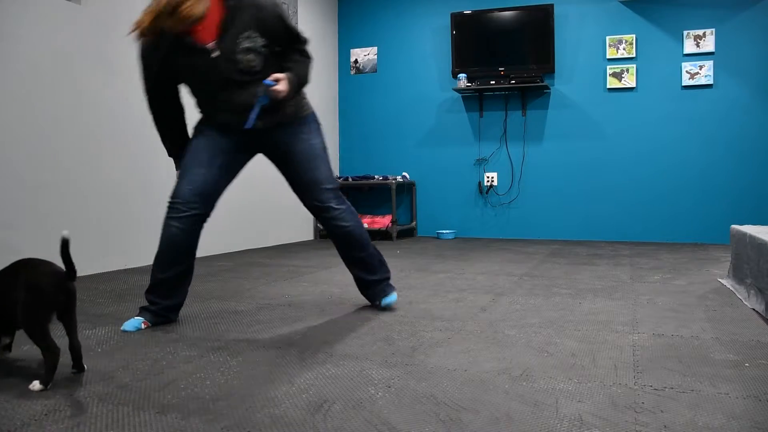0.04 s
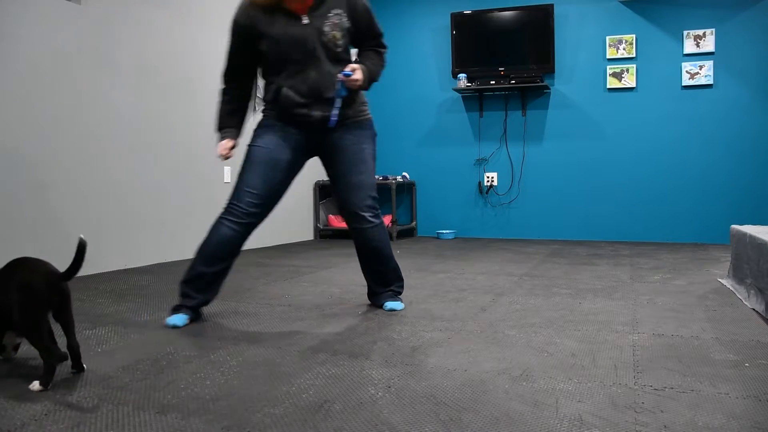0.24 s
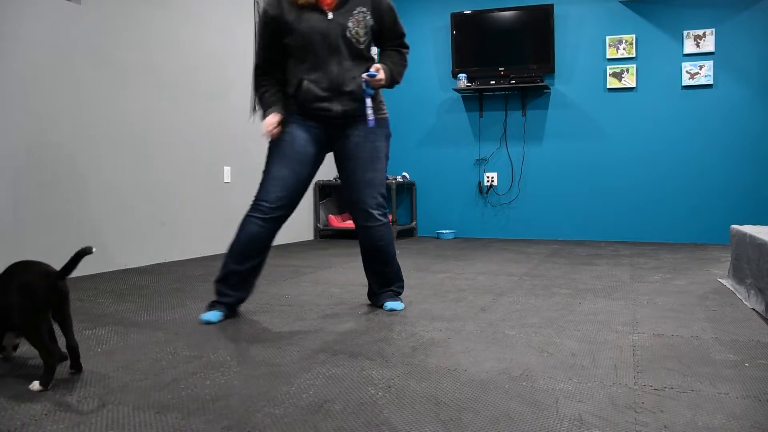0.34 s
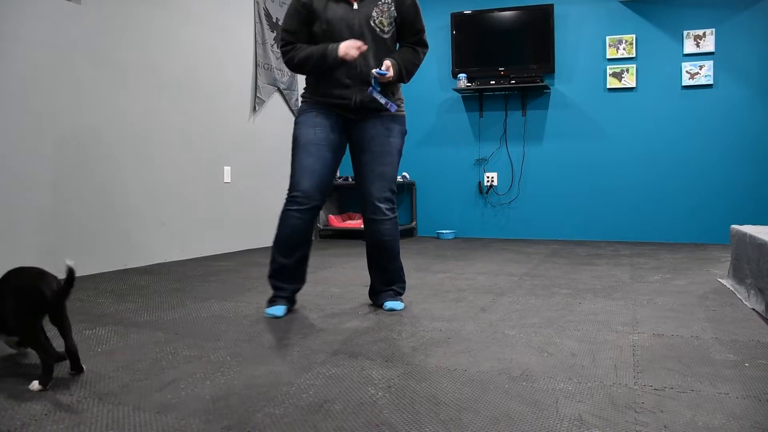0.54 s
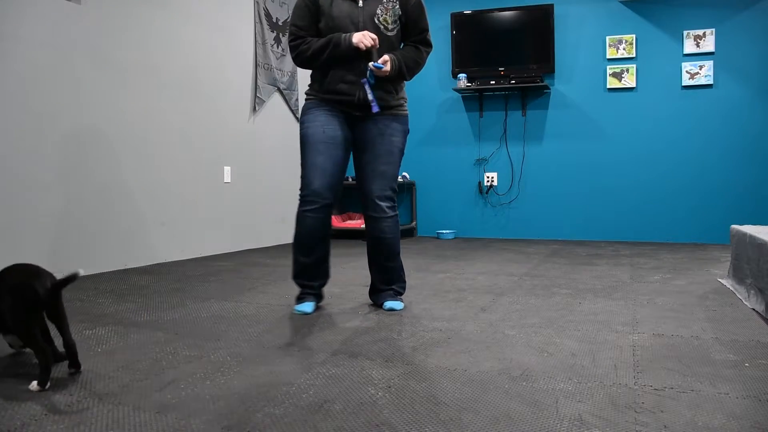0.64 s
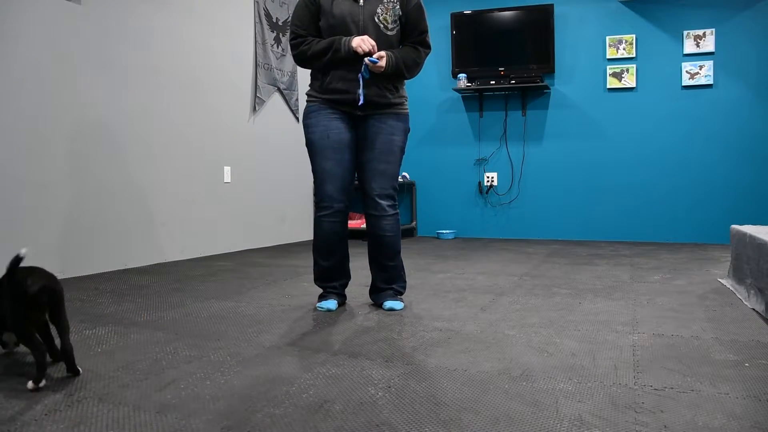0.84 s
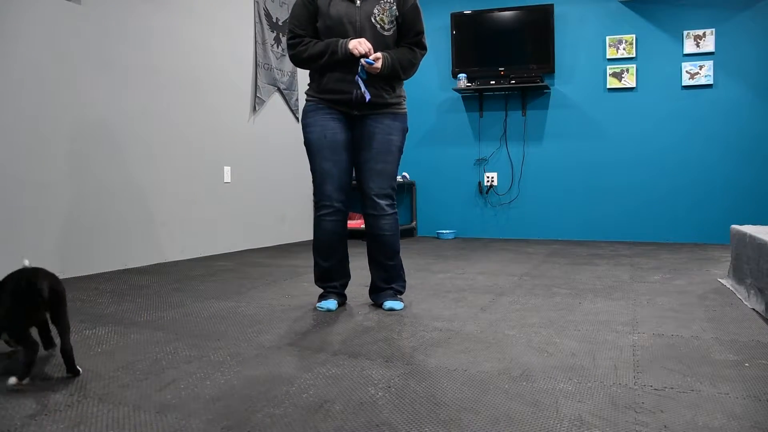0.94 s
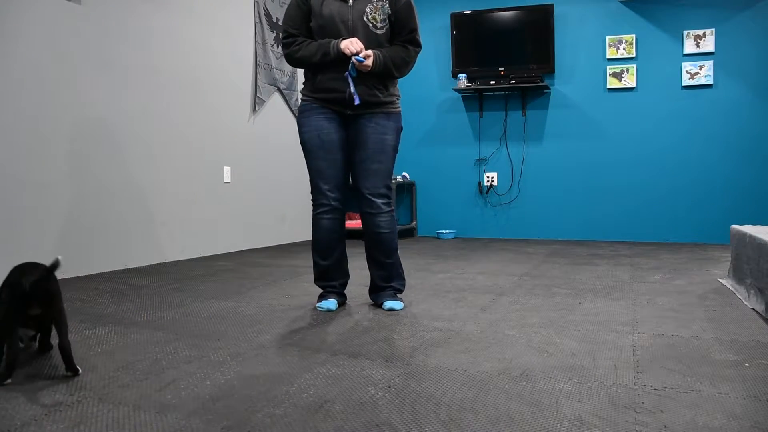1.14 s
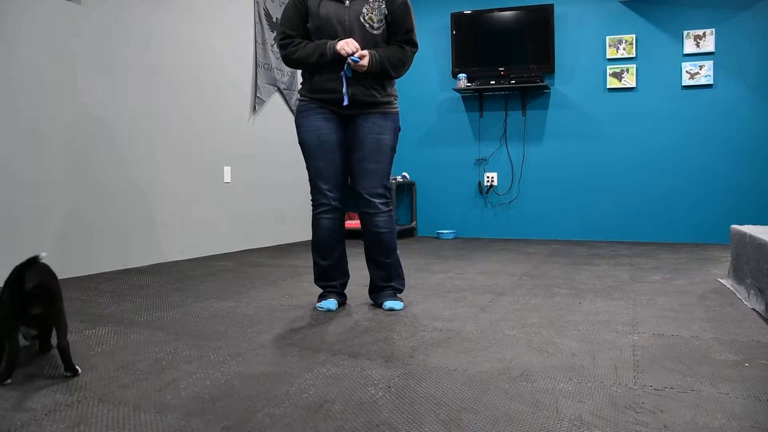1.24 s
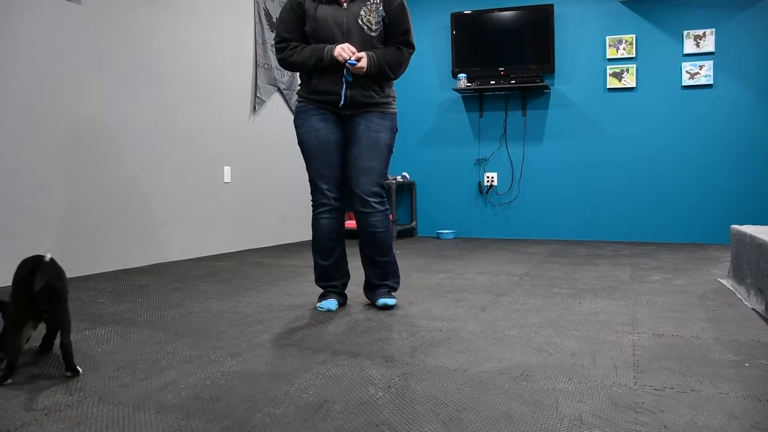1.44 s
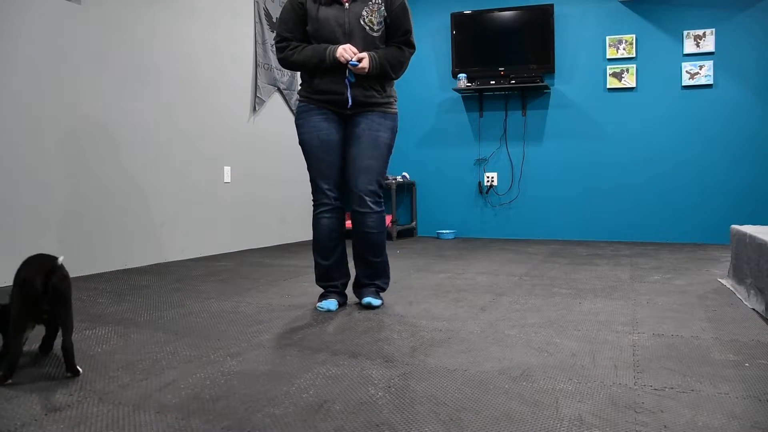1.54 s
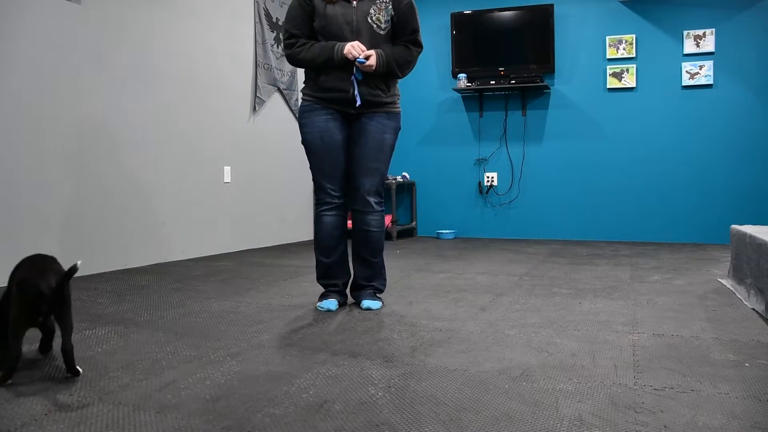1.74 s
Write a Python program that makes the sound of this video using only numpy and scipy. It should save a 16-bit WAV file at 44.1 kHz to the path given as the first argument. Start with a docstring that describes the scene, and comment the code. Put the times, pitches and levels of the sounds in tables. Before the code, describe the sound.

A socked foot drags across a rubber floor with a hiss, amid soft thuds and rustling.

```python
"""Ventilation, a low hum and a thin electrical whine hang in a bare room.
Clothes stir, and a socked foot lands with a soft thud on a textured rubber floor.
The other foot is dragged across to meet it, its fibres hissing over the grain.
Light taps and short scuffs follow, and jeans and a jacket rustle as the weight settles,
the room answering each move."""
import sys
import numpy as np
from scipy import signal
from scipy.fft import rfft, irfft, next_fast_len
from scipy.io import wavfile
from scipy.ndimage import map_coordinates

SR = 44100
rng = np.random.default_rng(int(sys.argv[2]) if len(sys.argv) > 2 else 0)


def inscribe(sig):
    """Save sig as 16-bit PCM at rate SR to the path in sys.argv[1].

    A 1-D sig is mono; a 2-D sig holds one channel per row.
    Samples are clipped to [-1, 1] before scaling.
    """
    pcm = np.round(np.clip(np.atleast_2d(sig).T, -1, 1) * 32767)
    wavfile.write(sys.argv[1], SR, pcm.astype(np.int16))


N = 79380
T = np.arange(N) / SR


def amp(db):
    return 10 ** (np.asarray(db) / 20)


def unit_rms(x):
    return x / np.sqrt(np.mean(x ** 2) + 1e-20)


def curve_at(points, hz):
    """Read a curve of (freq_hz, value) points on a log frequency axis."""
    freqs, values = np.transpose(points)
    return np.interp(np.log(hz + 1), np.log(freqs + 1), values)


def fader(rows):
    """Gain riding through (time_s, level_db) points, silent outside them."""
    return amp(np.interp(T, *np.transpose(rows), left=-120, right=-120))


def wobble(rate_hz):
    """A smooth random drift through rate_hz points a second."""
    return map_coordinates(rng.standard_normal(4096), [T * rate_hz], mode="wrap")


def equalise(x, gain_at):
    """Colour x with a gain that depends on frequency."""
    size = next_fast_len(N + SR // 2)
    return irfft(rfft(x, size) * gain_at(np.fft.rfftfreq(size, 1 / SR)), size)[..., :N]


def friction(spectrum, slips_per_s, smooth):
    """Tiny random slips blended with a share of smooth noise, coloured, at unit rms."""
    slips = rng.standard_normal(N) * (rng.random(N) < slips_per_s / SR)
    force = np.sqrt(1 - smooth) * unit_rms(slips) + np.sqrt(smooth) * rng.standard_normal(N)
    return unit_rms(equalise(force, lambda hz: amp(curve_at(spectrum, hz))))


def envelope(start_s, rise_s, t60_s):
    """A rounded attack, then an exponential decay."""
    age = T - start_s
    attack = np.sin(np.pi / 2 * np.clip(age / rise_s, 0, 1))
    return attack * np.exp(-np.log(1000) * np.maximum(age - rise_s, 0) / t60_s)


# How alike the room sounds left and right: freq_hz, correlation
STEREO_LIKENESS = [(100, 0.7), (300, 0.82), (600, 0.61), (1200, 0.42), (2200, -0.021), (15000, -0.033)]


def diffuse(pair):
    """Spread two unrelated signals all round: near the centre in the lows, wide in the highs."""
    def mid_side_gains(hz):
        angle = np.arccos(curve_at(STEREO_LIKENESS, hz)) / 2
        return np.array([np.cos(angle), np.sin(angle)])
    mid, side = equalise(pair, mid_side_gains)
    return np.array([mid + side, mid - side])


# Ring of the bare room: freq_hz, t60_s
ROOM_DECAY = [(100, 1), (500, 1), (2000, 0.73), (6000, 0.69), (10000, 0.48), (15000, 0.27)]


def room(x, wet_db, early_db, early_s, positions=12):
    """Direct sound, near reflections and a tail, crossfading to fresh echoes as the feet move."""
    hz, t, noise = signal.stft(rng.standard_normal((positions, 2, SR // 3)), SR, nperseg=256)
    late = np.exp(-np.log(1000) * t / curve_at(ROOM_DECAY, hz)[:, None])
    early = amp(early_db) * np.exp(-t / early_s)
    tails = signal.istft(noise * (late + early), SR, nperseg=256)[1]
    tails /= np.sqrt(np.mean(np.sum(tails ** 2, axis=-1)))
    hop = N // positions + 1
    padded, wet = np.pad(x, (0, 2 * hop)), np.zeros((2, N + SR))
    for k, tail in enumerate(tails):
        crossfade = signal.windows.cosine(2 * hop)
        if k == 0:
            crossfade[:hop] = 1
        piece = padded[k * hop:][:2 * hop] * crossfade
        echo = signal.fftconvolve(piece[None], tail, axes=1)
        wet[:, k * hop:][:, :echo.shape[1]] += echo
    return (x + amp(wet_db) * diffuse(wet[:, :N])) / np.hypot(1, amp(wet_db))


# Colour of the ventilation: freq_hz, gain_db
AIR_EQ = [(25, 4), (45, 5), (110, 8), (170, 4.5), (400, 5.5), (800, 2), (2000, -2), (4000, 0.5), (8500, 1),
          (10500, -7), (13000, -7), (15600, -18)]
# The hum sinking away: time_s, level_db
HUM_FADE = [(0, -60.5), (.75, -63), (1.15, -65.5), (1.5, -72), (1.8, -72)]
# Balance of the whine: left_db, right_db
WHINE_LEVELS = [-54.5, -65]


def room_tone(air_db=-56, hum_hz=74.5, waver_db=1.2, whine_hz=15695.5):
    """The bed: ventilation air, its wavering hum and a steady electrical whine."""
    air = equalise(rng.standard_normal((2, N)), lambda hz: amp(curve_at(AIR_EQ, hz)))
    hum_gain = fader(HUM_FADE) * amp(waver_db * wobble(13.9))
    hum = hum_gain * np.sin(2 * np.pi * hum_hz * T + 0.35 * wobble(5.1))
    whine = amp(WHINE_LEVELS)[:, None] * np.sin(2 * np.pi * whine_hz * T)
    return amp(air_db) * unit_rms(diffuse(air)) + np.sqrt(2) * (hum + whine)


# Colours of the airy cloth and the nasal denim rasp: freq_hz, gain_db
CLOTH_EQ = [(150, -20), (500, -4.5), (900, -2.5), (1300, 0.5), (1900, 2.5), (2800, 2), (4500, -0.5),
            (6500, 2), (9000, -1.5), (10500, -7.5), (15500, -21)]
DENIM_EQ = [(500, -40), (1150, -12), (1550, -4), (2100, -2), (2700, -23), (5000, -20), (12000, -48)]
# Folds rubbing, and denim catching on denim: peak_s, level_db, rise_s, t60_s
CLOTH_SWELLS = [(.01, -51, 0.055, 0.39), (.1, -41.5, 0.047, 0.27), (.17, -46.5, 0.035, 0.13),
                (.775, -39, 0.14, 0.37), (.965, -44.5, 0.036, 0.29), (1.085, -46.5, 0.068, 0.15),
                (1.41, -47.5, 0.16, 0.59), (1.495, -50.5, 0.078, 0.16), (1.589, -44, 0.048, 0.22),
                (1.66, -54, 0.056, 0.37), (1.79, -59, 0.062, 0.26)]
DENIM_SWELLS = [(1.5, -53, 0.017, 0.086), (1.557, -49, .012, .18), (1.603, -54, .01, 0.1)]


def clothes():
    """Cloth rubs on cloth in soft overlapping swells; near the end the denim rasps."""
    def swells(rows):
        return sum(amp(db) * envelope(peak - rise, rise, t60) for peak, db, rise, t60 in rows)
    flutter = amp(2.2 * wobble(90))
    rustle = swells(CLOTH_SWELLS) * unit_rms(flutter * friction(CLOTH_EQ, slips_per_s=2000, smooth=0.68))
    rasp = swells(DENIM_SWELLS) * friction(DENIM_EQ, slips_per_s=600, smooth=0.35)
    return (room(rustle, wet_db=15, early_db=9.5, early_s=0.0019, positions=36)
            + room(rasp, wet_db=-1, early_db=12, early_s=0.002))


# Bright brush of sock on rubber: freq_hz, gain_db
SCUFF_EQ = [(100, -35), (300, -11), (1000, -23), (2600, -3), (4500, -5), (6500, -4.5), (9000, 1.5),
            (10300, -9), (15500, -18)]
# Short slides: start_s, level_db, rise_s, t60_s
SCUFF_CUES = [(0.081, -37.5, 0.018, 0.21), (.206, -37.5, 0.017, 0.11), (1.034, -39, 0.0044, 0.023),
              (1.433, -38, 0.015, 0.17), (1.564, -40.5, 0.013, 0.061)]


def scuffs():
    """The sock slips a little way as a foot is set down or turned."""
    gain = sum(amp(db) * envelope(start, rise, t60) for start, db, rise, t60 in SCUFF_CUES)
    brush = friction(SCUFF_EQ, slips_per_s=7600, smooth=0.67)
    return room(gain * brush, wet_db=6, early_db=-0.5, early_s=0.006)


# Colour of a light tap: freq_hz, gain_db
TAP_EQ = [(100, -14), (280, 3), (500, 3.5), (1000, 0), (1900, 1.5), (3000, -3.5), (7000, -4), (9000, 0.5),
          (10500, -14), (15500, -24)]
# Toes and paws touching down: start_s, level_db, t60_s
TAP_CUES = [(1.025, -39.5, 0.074), (1.035, -39, 0.025), (1.059, -45, 0.093), (1.067, -45.5, 0.047),
            (1.342, -47.5, 0.043)]


def taps(rise_s=0.0021):
    """A light touch crushes the mat in a puff of noise, with no bounce under it."""
    gain = sum(amp(db) * envelope(start, rise_s, t60) for start, db, t60 in TAP_CUES)
    crush = friction(TAP_EQ, slips_per_s=5700, smooth=0.92)
    return room(gain * crush, wet_db=4, early_db=10, early_s=0.0026)


# Colour of the crushed mat around a thud's pitch: pitch_ratio, gain_db
THUD_EQ = [(.12, -24), (.45, -19), (1, -2.5), (1.7, -8.5), (3, -3.5), (6, -11), (14, -16.5), (60, -39)]
# Weight coming down on the mat: start_s, level_db, t60_s, pitch_hz
FOOTFALL_CUES = [(.076, -39, 0.047, 213), (0.117, -47.5, 0.061, 112), (0.216, -47, 0.11, 366),
                 (0.254, -32.5, 0.042, 418), (0.528, -49, 0.15, 159), (0.554, -46.5, 0.25, 245)]


def footfalls(rise_s=0.0021, puff_over_bounce_db=2):
    """Each thud is a dry, damped bounce of the floor plus a roomy puff as the mat is crushed."""
    bounces = puffs = 0
    for start, db, t60, pitch_hz in FOOTFALL_CUES:
        gain = amp(db) * envelope(start, rise_s, t60)
        bounces += gain * np.sqrt(2) * np.sin(2 * np.pi * pitch_hz * (T - start))
        spectrum = [(ratio * pitch_hz, gain_db) for ratio, gain_db in THUD_EQ]
        puffs += gain * amp(puff_over_bounce_db) * friction(spectrum, slips_per_s=6400, smooth=0.9)
    return bounces + room(puffs, wet_db=3, early_db=4.5, early_s=0.0023)


# Colours of the bright fibre hiss and the fuller sole rub: freq_hz, gain_db
HISS_EQ = [(200, -34.5), (1100, -30.5), (2000, -15.5), (3000, -10), (4600, -7.5), (6300, -0.5),
           (7400, -1.5), (8300, 2), (9200, -1.5), (10200, -8.5), (12000, -14.5), (15500, -20)]
RUB_EQ = [(100, -22), (205, -23), (252, 3), (305, -10), (500, 1), (850, -0.5), (1150, -2), (1700, 1),
          (3000, -1.5), (6000, -0.5), (12000, -38)]
# The hiss rides the foot's speed, the rub its pressure: time_s, level_db
HISS_RIDE = [(.205, -41), (.222, -33), (.245, -28), (.275, -22.5), (.33, -25), (.4, -22.5), (.48, -26),
             (.6, -25.5), (.68, -25), (.78, -28.5), (.83, -64), (.9, -60), (.96, -80)]
RUB_RIDE = [(.205, -41), (.222, -43), (.243, -39), (.262, -33.5), (.31, -33), (.41, -34.5), (.5, -39.5),
            (.6, -56), (.7, -47), (.8, -55.5), (.95, -56)]


def foot_drag(surge_db=0.22, grain_db=1.6):
    """Fibres catch on the floor's grain in uneven spurts; the loaded sole adds a lower rub."""
    spurts = amp(surge_db * wobble(43.5) + grain_db * wobble(480))
    hiss = unit_rms(spurts * friction(HISS_EQ, slips_per_s=9000, smooth=0.6)) * fader(HISS_RIDE)
    rub = unit_rms(spurts * friction(RUB_EQ, slips_per_s=2500, smooth=0.65)) * fader(RUB_RIDE)
    return (room(hiss, wet_db=13.5, early_db=1.5, early_s=0.0052, positions=160)
            + room(rub, wet_db=3.5, early_db=10, early_s=0.0011, positions=48))


def scene():
    return foot_drag() + footfalls() + taps() + scuffs() + clothes() + room_tone()


# Tilt between the microphone ports: freq_hz, left_minus_right_db
PORT_BALANCE = [(200, 0.5), (1000, -.5), (2900, -1.5), (4300, 0.7), (6000, 0.5), (7200, 0.5), (8200, 1.5),
                (9100, -7.5), (10200, 2), (12500, -2), (15000, 2)]


def record(dry, cutoff_hz=15900):
    """Each microphone port has its own treble colour; nothing passes above the cutoff."""
    split = np.array([[0.5], [-0.5]])
    return equalise(dry, lambda hz: amp(curve_at(PORT_BALANCE, hz) * split) * (hz < cutoff_hz))


dry = scene()
out = record(dry)
inscribe(out)
```